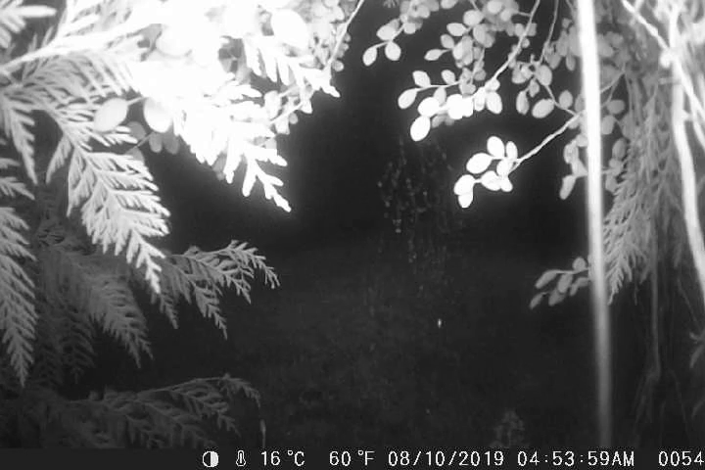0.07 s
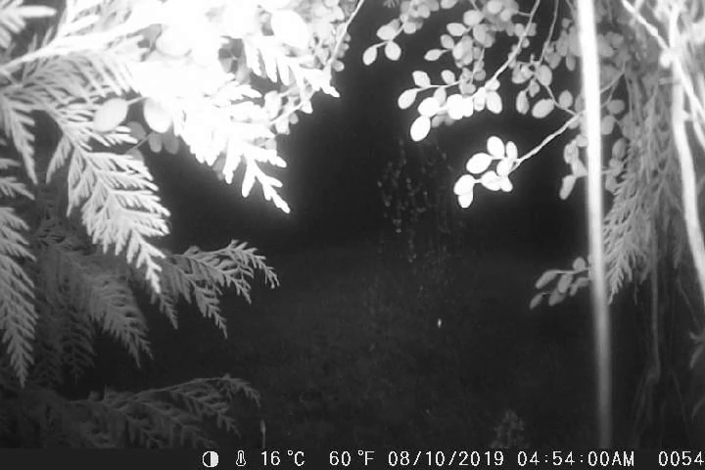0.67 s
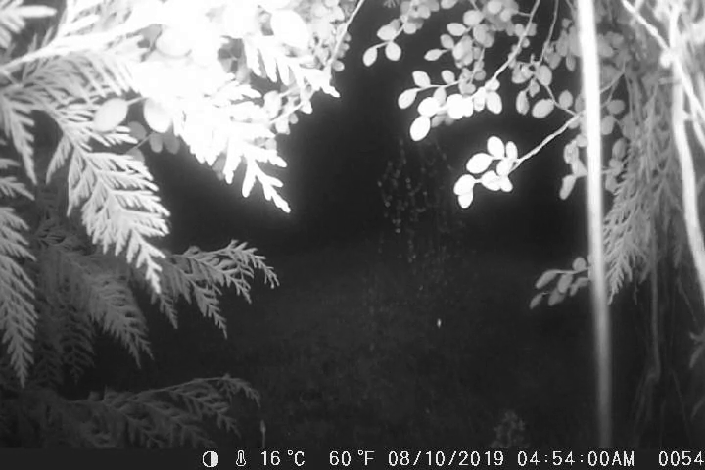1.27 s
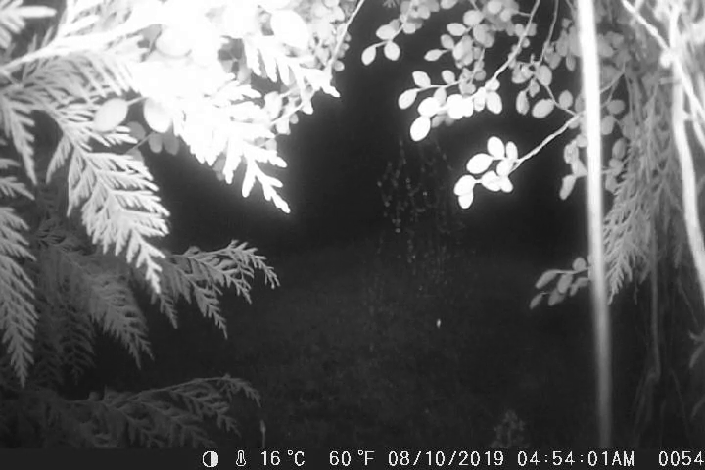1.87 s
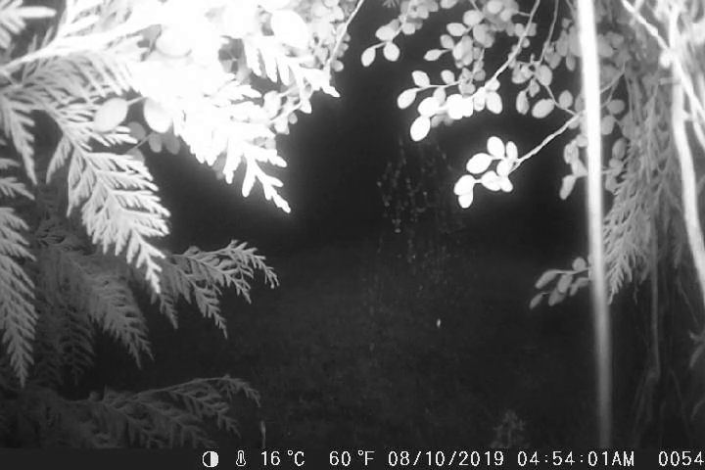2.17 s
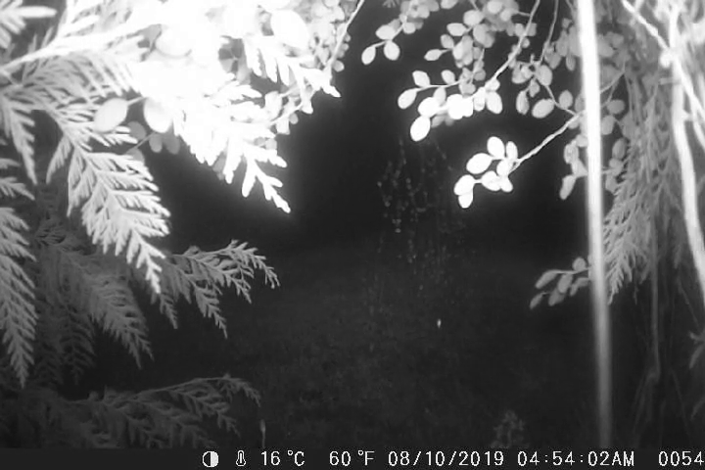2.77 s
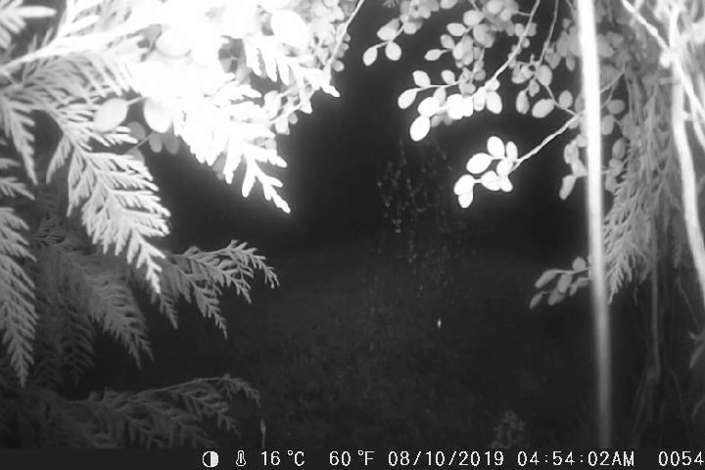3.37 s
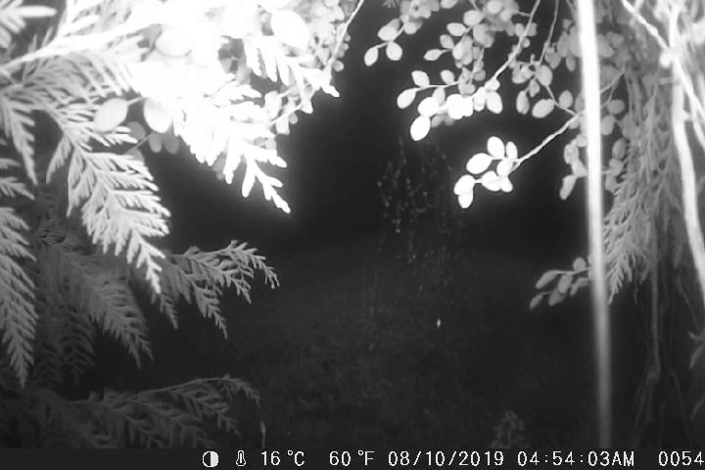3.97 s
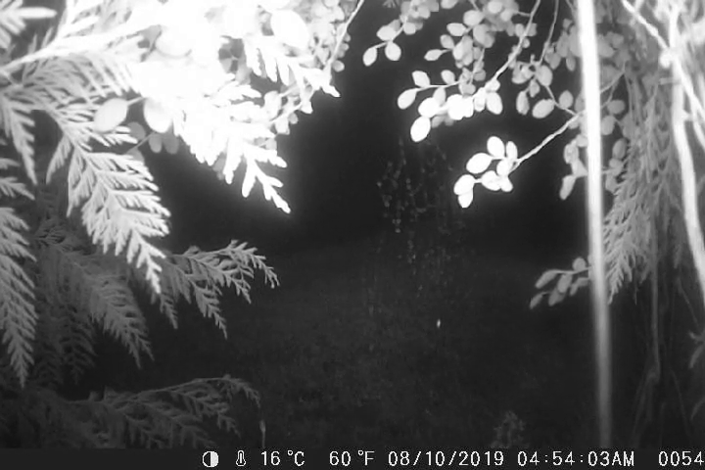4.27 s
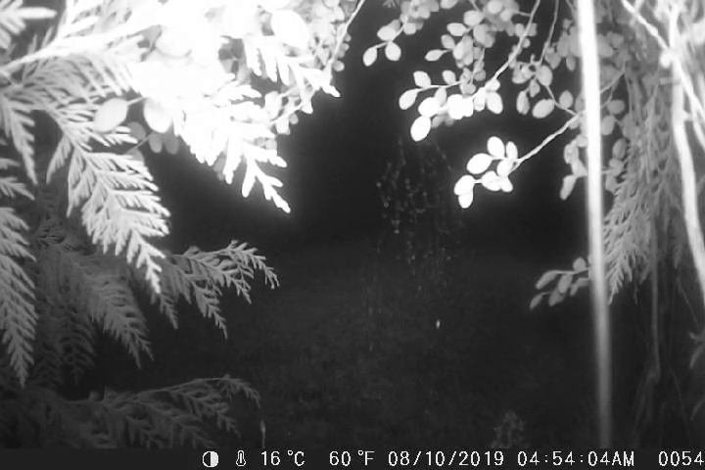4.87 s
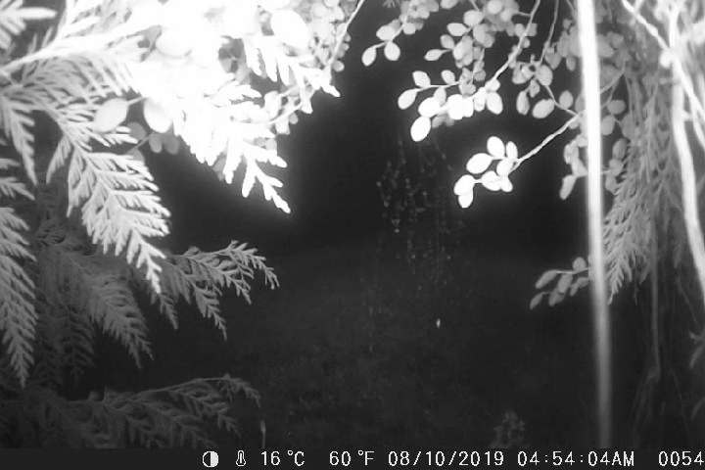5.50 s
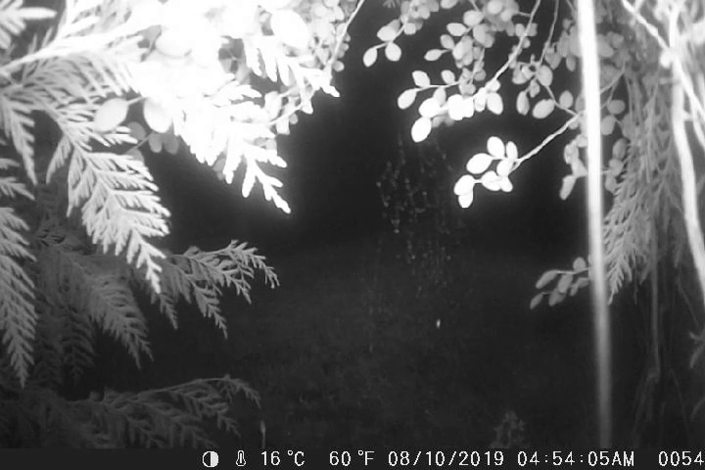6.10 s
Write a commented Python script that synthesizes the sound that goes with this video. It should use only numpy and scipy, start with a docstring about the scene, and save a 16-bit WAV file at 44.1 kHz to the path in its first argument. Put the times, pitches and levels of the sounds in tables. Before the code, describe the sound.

A microphone switches on with a loud, thumping pop right at the start. A quiet bed follows and lasts about six seconds: low rumble, thin hiss, very faint drizzle and an electronic hum, with soft pulsing ticks five times a second. Water drips irregularly from trees onto wet leaves, making small, faint pats near and far, a little clearer around 1.2 and 5.5 seconds. Light drops tap the plastic camera housing at about 1, 2 and 2.5 seconds. At 3.5 seconds a sharp, close tap on the housing stands far above the other drops, followed by a quick spatter and a second strong tap at 3.7. Lighter taps come around 4 and 4.7 seconds. Soft, dull thuds on the ground occur near 1.6 and 4.8 seconds. The night setting is still, with almost no echo, and the sound is mono and slightly dull.

```python
"""Under dripping trees at night, a trail camera's microphone switches on with a pop.
A low rumble, a thin hiss and a fine drizzle make the bed; over it the camera's own electronics
hum at multiples of the frame rate and tick five times a second. Drops set wet leaves ringing
near and far, tap on the camera's plastic housing and thud softly on the ground."""
import sys
import numpy as np
from scipy import signal
from scipy.fft import rfft, irfft
from scipy.io import wavfile
from scipy.ndimage import uniform_filter1d

SR = 44100
rng = np.random.default_rng(int(sys.argv[2]) if len(sys.argv) > 2 else 0)


def store_wav(level_fs):
    """Save 16-bit WAV to argv[1]."""
    pcm = np.round(np.clip(np.atleast_2d(level_fs), -1, 1) * 32767)
    wavfile.write(sys.argv[1], SR, pcm.T.astype(np.int16))


N = 275184
TIME = np.arange(N) / SR


def from_db(db):
    """Decibels to gain."""
    return 10 ** (np.asarray(db) / 20)


def rms_one(x):
    """Scale to rms 1."""
    return x / np.sqrt(np.mean(x ** 2) + 1e-20)


def butter(x, hz, kind, order=2):
    """Causal Butterworth filter."""
    return signal.sosfilt(signal.butter(order, np.minimum(hz, .45 * SR), kind, fs=SR, output="sos"), x)


def resonance(x, hz, width_hz):
    """One resonant band, unity gain at its peak."""
    return signal.lfilter(*signal.iirpeak(hz, hz / width_hz, fs=SR), x)


def coloured(x, spectrum):
    """Shape a white signal with an EQ curve; rms 1."""
    hz, db = np.transpose(spectrum)
    bins = np.maximum(np.fft.rfftfreq(N, 1 / SR), 1)
    curve_db = np.interp(np.log(bins), np.log(hz), db)
    return rms_one(irfft(rfft(x) * from_db(curve_db), N))


def decay(t, t60):
    """A fade that loses 60 dB every t60 seconds."""
    return np.exp(-np.log(1000) * t / t60)


def swell(t, rise_s, t60):
    """An attack-and-decay envelope that peaks at 1."""
    shape = (1 - np.exp(-t / rise_s)) * decay(t, t60)
    return shape / shape.max()


def add(out, start_s, sound):
    """Mix a sound in at its start time."""
    at = max(round(start_s * SR), 0)
    out[at:at + len(sound)] += sound[:max(N - at, 0)]


def switch_on_pop(start_s=.0363, step_db=-9.0, settle_s=0.12):
    """The microphone's bias voltage jumps on and drains through the coupling capacitor."""
    out = np.zeros(N)
    add(out, start_s, from_db(step_db) * np.exp(-TIME / settle_s))
    return out


# The rumble's EQ, heavy in the sub-bass. Each row: frequency in Hz, relative level in dB.
RUMBLE_EQ = [(5, -4.5), (15, 1.5), (40, -9), (80, -17), (130, -20), (190, -18), (260, -26.5), (450, -29.5),
             (800, -34), (1500, -46), (3000, -71)]
# The hiss's EQ, falling away above 7 kHz. Each row: frequency in Hz, relative level in dB.
HISS_EQ = [(500, -2), (3700, 1.5), (5000, -2), (7000, 2.5), (8000, -7.5), (8900, -25), (16000, -26.5)]

def rumble_and_hiss(rumble_db=-58.5, hiss_db=-77.5):
    """A steady noise bed: deep rumble underneath, thin hiss on top."""
    rumble = from_db(rumble_db) * coloured(rng.standard_normal(N), RUMBLE_EQ)
    hiss = from_db(hiss_db) * coloured(rng.standard_normal(N), HISS_EQ)
    return rumble + hiss


# The drizzle's EQ, forward in the mids. Each row: frequency in Hz, relative level in dB.
DRIZZLE_EQ = [(500, -17.5), (880, -8.5), (1100, 5), (1260, -1.5), (1420, 3), (1850, -7), (2150, -6.5),
              (2700, -9), (3100, -8.5), (4500, -25.5), (8000, -47)]

def drizzle(level_db=-76, drops_per_s=900, size_db=3.0, wash=.8):
    """Countless tiny far drops, partly merged into a wash."""
    sizes = from_db(size_db * np.minimum(rng.exponential(1, N), 4))
    polarity = rng.choice([-1, 1], N)
    grains = rms_one(sizes * polarity * (rng.random(N) < drops_per_s / SR))
    return from_db(level_db) * coloured(grains + wash * rng.standard_normal(N), DRIZZLE_EQ)


# The partials of the hum. Each row: multiple of the frame rate, rms level in dB.
HUM_PARTIALS = [(2, -71.5), (3, -67.5), (5, -81), (7, -78), (8, -86.5), (9, -87.5), (10, -86), (11, -86.5),
                (15, -101.5)]

def frame_hum(frame_hz=30.03):
    """The electronics hum on harmonics of the frame rate."""
    return sum(np.sqrt(2) * from_db(db) * np.sin(2 * np.pi * (multiple * frame_hz * TIME + rng.random()))
               for multiple, db in HUM_PARTIALS)


def card_writes(first_s=.0385, period_s=.2, write_s=0.0233, bump_db=-45, tick_db=-74, fizz_db=-82):
    """Each write to the memory card loads the supply with a soft bump, a tick and a fizz."""
    since = (TIME - first_s) % period_s
    writing = 1. * (since < write_s)
    bump = butter(butter(writing, 16, "high", order=1), 110, "low")
    tick = rms_one(resonance(rng.standard_normal(N), hz=3900, width_hz=700))
    tick *= swell(since, rise_s=.0005, t60=0.032)
    fizz = rms_one(butter(rng.standard_normal(N), [1000, 7800], "band", order=10)) * writing
    return from_db(bump_db) * bump + from_db(tick_db) * tick + from_db(fizz_db) * fizz


# The modes of a wet leaf. Each row: multiple of its pitch, ring level in dB, ring t60 in seconds,
# level under spray in dB, bandwidth under spray in Hz.
LEAF_MODES = [(1.001, 0.5, 0.14, 9.5, 198), (1.3, -24, 0.011, -3.5, 354), (1.75, 0.5, 0.0075, -5, 300),
              (2.008, 4.5, 0.036, -8, 260), (2.4, 2.5, 0.032, -16, 298)]

def leaf_ring(t, pitch_hz):
    """A leaf rings freely after one blow."""
    return sum(from_db(db) * np.cos(2 * np.pi * pitch_hz * ratio * t) * decay(t, t60)
               for ratio, db, t60, _, _ in LEAF_MODES)


def leaf_spray(t, pitch_hz, grain_db=3.5):
    """Grainy spray patters through the leaf's resonances; rms 1."""
    spray = rng.standard_normal(len(t)) * from_db(grain_db * rng.standard_normal(len(t)))
    return rms_one(sum(from_db(db) * resonance(spray, pitch_hz * ratio, width_hz)
                       for ratio, _, _, db, width_hz in LEAF_MODES))


def at_depth(depth, front, inside):
    """Glide by equal ratios from the value in front of the foliage to the value far inside."""
    return front * (inside / front) ** depth


# Drops on leaves. Each row: start in seconds, spray level in dB, leaf pitch in Hz,
# depth in the foliage from 0 (in front) to 1 (far inside).
LEAF_HITS = [(0.348, -69, 1070, 0.68), (.513, -65.5, 1140, 0.98), (.627, -70, 1130, .3),
             (1.2211, -57, 1086, .02), (1.2805, -63, 1040, 0.36), (1.55, -69, 1060, .65),
             (2.398, -63.5, 1090, 0.6), (2.610, -69, 910, .65), (3.044, -64, 1220, 0.73),
             (3.122, -71, 1167, .05), (3.632, -64, 1290, 0.69), (3.766, -69.5, 1150, 0.88),
             (4.131, -67, 1080, 0.89), (4.539, -65, 1116, 0.52), (5.29, -71.5, 1250, .95),
             (5.498, -66, 1310, 0.63), (5.5291, -60, 1106, 0.2), (6.117, -70.5, 1664, .02)]

def leaf_drops(stray_count=40, stray_db=-73, stray_spread_db=3.5):
    """A drop rings a leaf and bursts into spray; deeper ones rise slower, last longer and lose punch."""
    t, out = TIME[:SR // 3], np.zeros(N)
    for start_s, db, pitch_hz, depth in LEAF_HITS:
        smear = swell(t, rise_s=at_depth(depth, 0.0008, 0.014), t60=at_depth(depth, .095, 0.33))
        blow = at_depth(depth, from_db(2.5), from_db(-13)) * leaf_ring(t, pitch_hz)
        add(out, start_s, from_db(db) * (leaf_spray(t, pitch_hz) * smear + blow))
    for when, softness, tuning in rng.random((stray_count, 3)):   # faint drips on leaves of all sizes
        drip = leaf_ring(t, pitch_hz=900 + 500 * tuning)
        add(out, when * N / SR, from_db(stray_db - stray_spread_db * softness) * drip)
    return butter(butter(out, 2850, "low", order=10), 650, "high")


# The modes of the plastic housing. Each row: frequency in Hz, level in dB, t60 in seconds,
# polarity at the microphone.
HOUSING_MODES = [(213, -25.5, 0.088, 1), (328, -24.5, 0.035, 1), (655, -7.5, 0.0174, 1),
                 (673, -8, 0.013, -1), (1011, -7.5, 0.025, 1), (1058, -16, 0.068, 1), (1080, -16, 0.047, 1),
                 (1200, -22, 0.07, 1), (1335, -19.5, 0.078, -1), (1398, -0.1, 0.023, 1),
                 (1476, -8.5, 0.027, -1), (1705, -20, 0.025, 1), (1817, -14, 0.023, -1),
                 (2000, -0.5, 0.0089, 1), (2065, 1.5, 0.015, -1), (2090, -3, 0.027, 1),
                 (2460, -5, 0.011, -1), (2600, -22, 0.049, -1), (2710, 1.67, 0.013, 1),
                 (2727, 2, 0.018, -1), (3625, -15, 0.017, -1), (3940, -21, 0.014, -1),
                 (4470, -20, 0.015, -1), (5770, -31.5, 0.024, 1), (6876, -20.5, 0.011, 1),
                 (7580, -26, 0.015, -1)]
# Drops on the housing. Each row: start in seconds, level in dB, tilt toward the treble in dB.
HOUSING_HITS = [(1.0231, -52.5, 2.5), (1.9494, -53, 12), (2.0764, -55.5, -12), (2.484, -51, -8),
                (3.5047, -23.5, -0.5), (3.5685, -49.5, 13), (3.5901, -47, 2), (3.64, -49, 4),
                (3.6728, -30.5, 1.5), (3.9772, -45, 10), (4.027, -52, 2), (4.5918, -57, -14),
                (4.6596, -52.5, 0), (4.7440, -57.5, -9)]

def housing_taps(contact_hz=7800, tilt_hz=2200, spot_spread_db=2.5, gain_db=2.5):
    """Each landing spot rings its own mix of modes; some taps sound bright, others dull."""
    t, out = TIME[:SR // 6], np.zeros(N)
    modes = np.array([np.sign(polarity) * from_db(db) * np.cos(2 * np.pi * hz * t) * decay(t, t60)
                      for hz, db, t60, polarity in HOUSING_MODES])
    for start_s, db, tilt_db in HOUSING_HITS:
        spot = uniform_filter1d(rng.standard_normal(len(modes)), size=3)   # nearby modes are hit alike
        ring = butter(from_db(spot_spread_db * spot) @ modes, contact_hz, "low", order=12)
        body = butter(ring, tilt_hz, "low", order=1)
        tap = body * from_db(-tilt_db) + (ring - body) * from_db(tilt_db)
        add(out, start_s, from_db(db + gain_db) * tap / np.abs(tap).max())
    return out


def foliage_echo(x, t60=0.18, wet_db=-42):
    """The trees scatter a faint, dull tail back."""
    t = TIME[:SR // 2]
    tail = butter(rng.standard_normal(len(t)), [600, 3000], "band") * swell(t, .006, t60)
    return from_db(wet_db) * signal.fftconvolve(x, tail / np.linalg.norm(tail))[:N]


# Dull thuds on the ground. Each row: start in seconds, level in dB, pitch in Hz.
GROUND_HITS = [(1.552, -66, 512), (1.559, -64.5, 175), (1.845, -68, 497), (4.596, -67.5, 356),
               (4.775, -60, 194), (4.799, -56.5, 103), (5.534, -72.5, 460)]

def ground_thuds(rise_s=0.0074, width_share=0.31, damping_hz=350):
    """Soft, low impacts without any click; the higher ones die sooner."""
    t, out = TIME[:SR // 2], np.zeros(N)
    for start_s, db, hz in GROUND_HITS:
        band = resonance(rng.standard_normal(len(t)), hz, width_share * hz)
        body = rms_one(resonance(band, hz, 2 * width_share * hz))
        envelope = swell(t, rise_s, t60=0.73 * np.exp(-hz / damping_hz))
        add(out, start_s, from_db(db) * body * envelope)
    return out


def scene():
    """Drops, night air and the camera's own noises, in mono; silent until the microphone is on."""
    pop = switch_on_pop()
    mic_on = pop > 0
    taps = housing_taps()
    drops = taps + foliage_echo(taps) + leaf_drops() + ground_thuds() + drizzle()
    bed = rumble_and_hiss() + frame_hum() + card_writes()
    return (pop + mic_on * (drops + bed))[None]


def record(dry, converter_noise_db=-99, cutoff_hz=16000):
    """A small, dull recorder: two narrow notches, a scoop between them and a peak in the treble."""
    x = dry - 0.61 * resonance(dry, hz=3150, width_hz=340)
    x = x - 0.31 * resonance(x, hz=6460, width_hz=290)
    x = x - 0.53 * resonance(x, hz=4500, width_hz=5940)
    x = x + 3.12 * resonance(x, hz=7910, width_hz=1250)
    x = butter(x, 3740, "low")
    x = x + from_db(converter_noise_db) * rng.standard_normal(N)
    return butter(x, cutoff_hz, "low", order=12)


dry = scene()
out = record(dry)
store_wav(out)
```